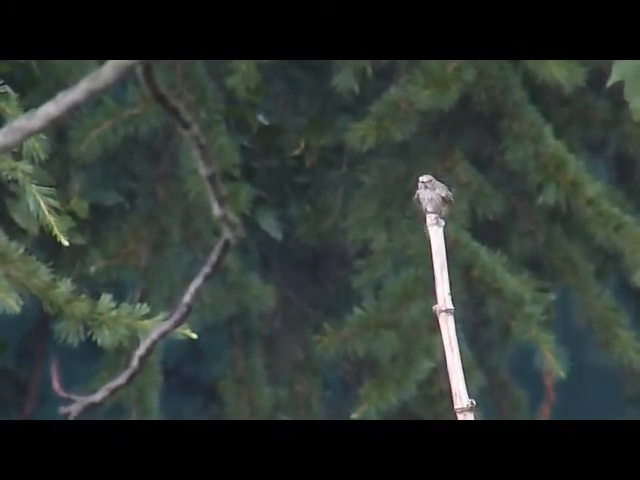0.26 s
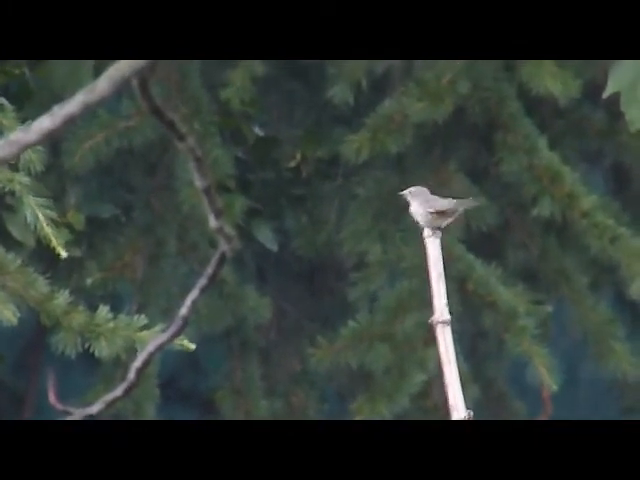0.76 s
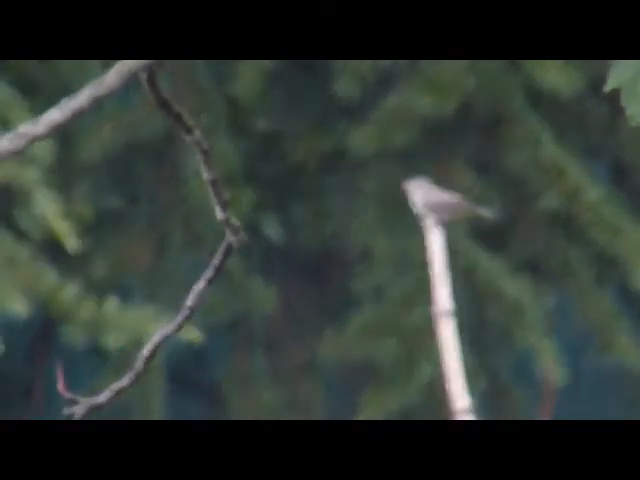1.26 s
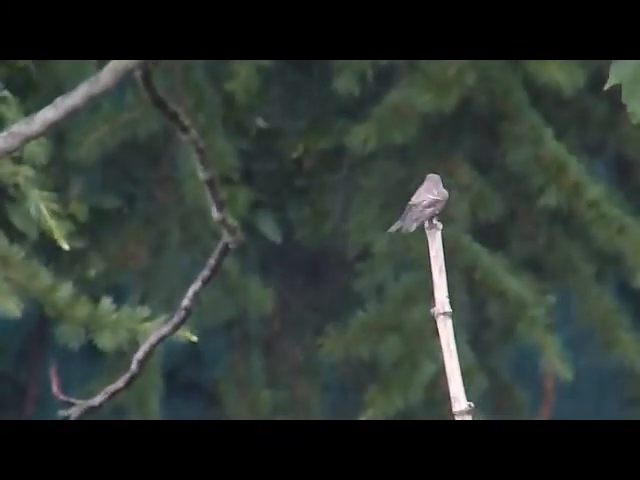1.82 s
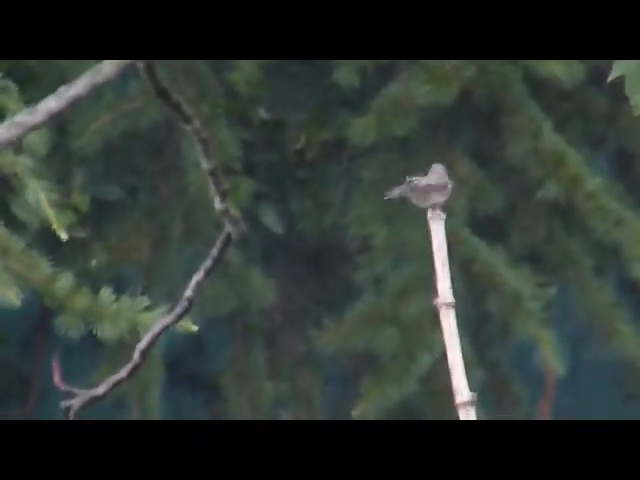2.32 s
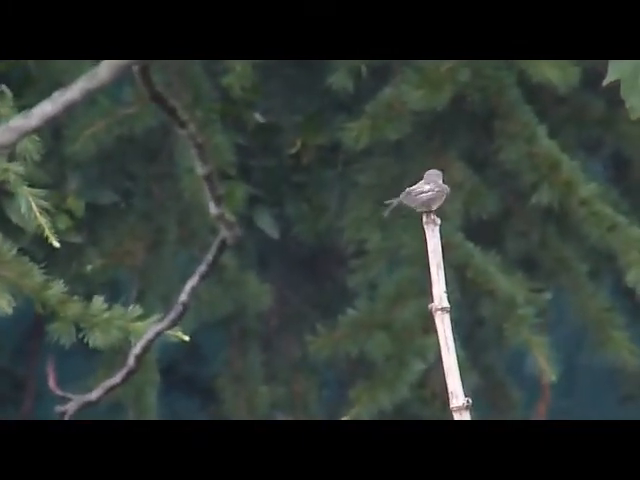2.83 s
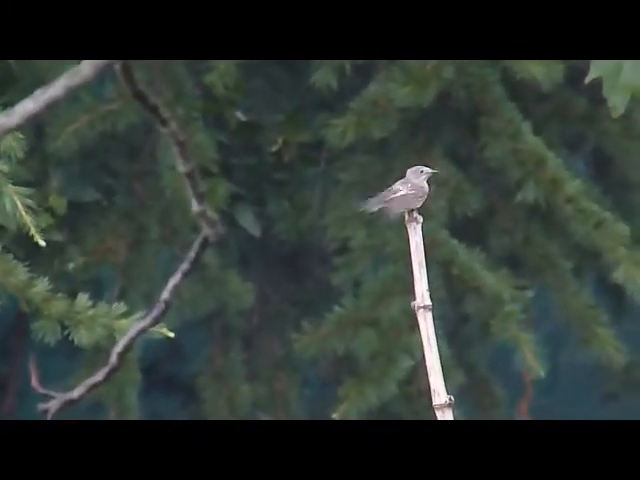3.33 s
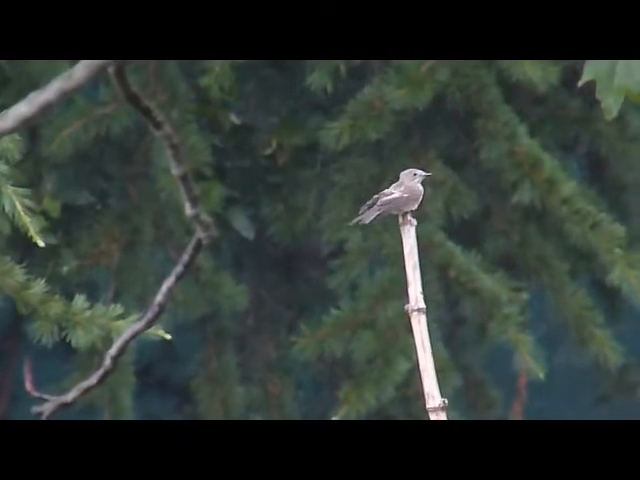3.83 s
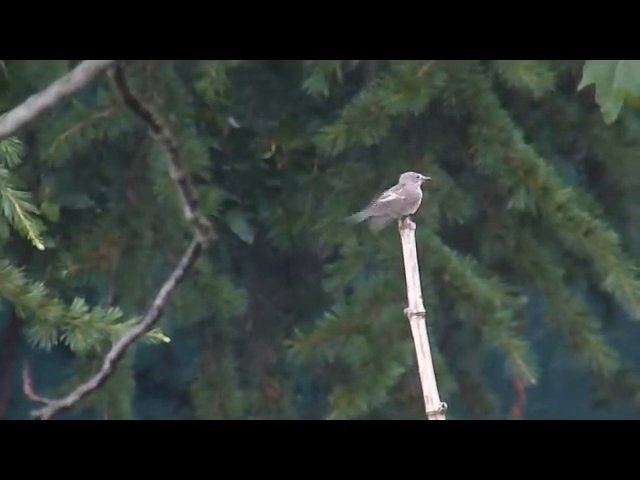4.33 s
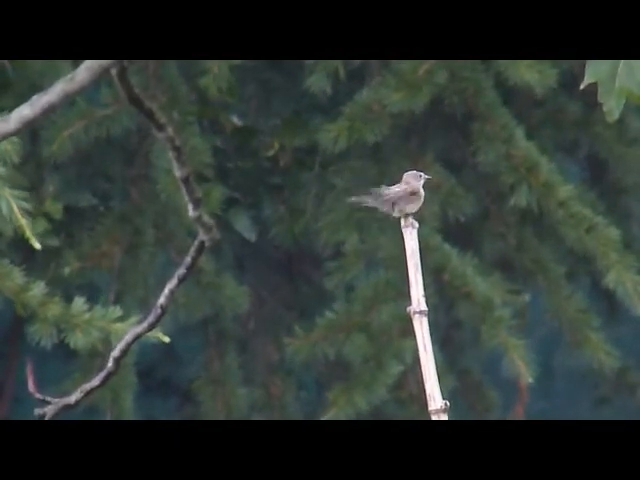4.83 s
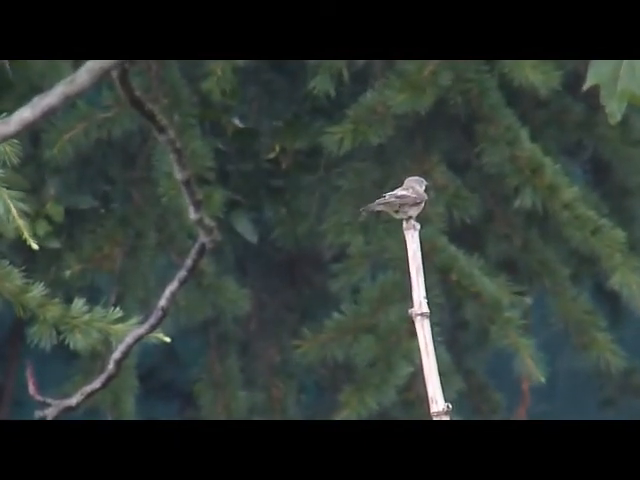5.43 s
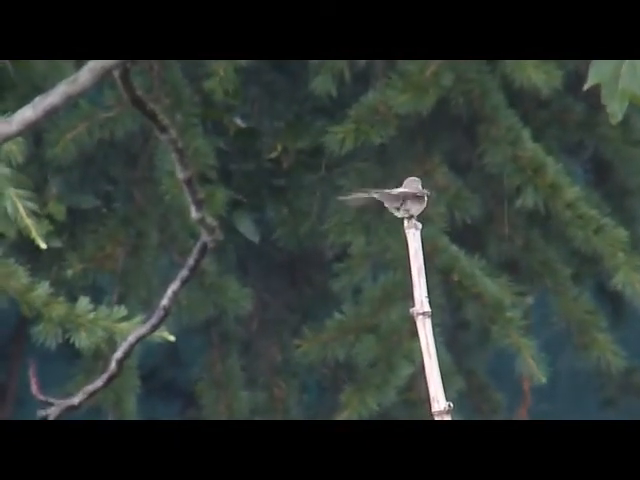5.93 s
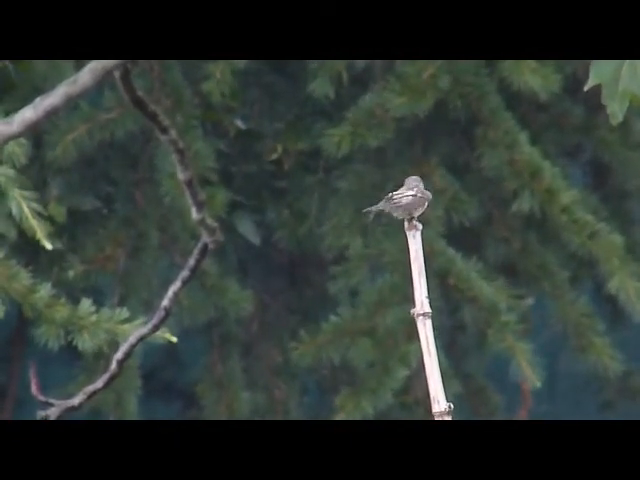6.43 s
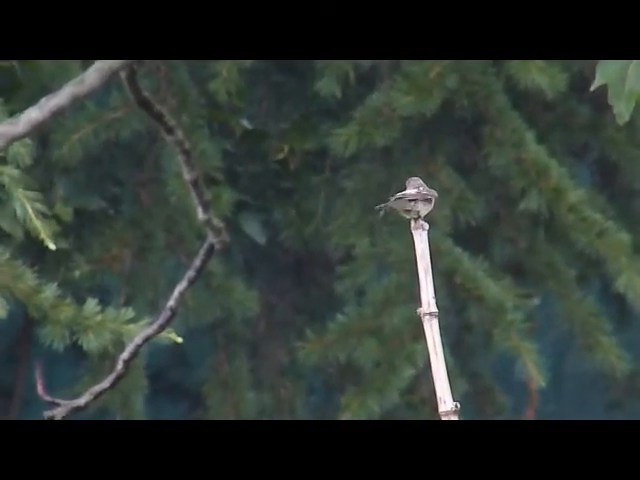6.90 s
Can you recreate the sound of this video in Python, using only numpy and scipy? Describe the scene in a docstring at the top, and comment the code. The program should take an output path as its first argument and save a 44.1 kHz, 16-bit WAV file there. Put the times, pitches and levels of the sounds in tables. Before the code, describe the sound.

Even rain on foliage over a low outdoor murmur, scattered crisp drips, a faint early grumble, then deep thunder building from five seconds.

```python
"""Steady rain on the trees of a garden, heard from a sheltered spot, over a low murmur.
Throughout, random impulses and patchy noise make hiss and patter, and short sine bursts make drips.
In the first four seconds the rain has brief flurries, and the murmur bumps softly and gains deep bass.
Near 2.4 s thunder grumbles faintly; from about five seconds it rolls in, as coloured noise and shocks,
with a deep boom under it, and swells into a few dull thuds."""
import sys
import numpy as np
from scipy import signal
from scipy.fft import rfft, irfft, next_fast_len
from scipy.io import wavfile
from scipy.ndimage import uniform_filter1d, map_coordinates

SR = 44100
rng = np.random.default_rng(int(sys.argv[2]) if len(sys.argv) > 2 else 0)


def wrap_up_sound(samples):
    """Save the sound to the file named by the first command line argument, as 16-bit audio."""
    columns = np.atleast_2d(samples).T
    # keep every value between -1 and 1, then stretch to whole-number steps
    tamed = np.clip(columns, -1, 1)
    steps = np.round(tamed * 32767).astype(np.int16)
    wavfile.write(sys.argv[1], SR, steps)


N = 315749


# spectrum of the fine ticking: frequency_hz, relative_density_db (dB per Hz)
HISS_SPECTRUM = [(1200, -24), (2400, -2), (3300, -0.5), (5000, 1), (6000, -0.5), (6600, -2), (7600, -6)]
# spectrum of the patter on foliage: frequency_hz, relative_density_db (dB per Hz)
WASH_SPECTRUM = [(150, -14.5), (320, -7.5), (470, -4), (620, -0.5), (800, -2.5), (980, -1), (1150, -3),
                 (1500, -3.5), (1800, -4.5), (2250, -4.5), (3000, -7), (4500, -12), (7000, -32.5)]
# brief flurries of heavier rain: crest_s, wash_rise_db
RAIN_FLURRIES = [(1.42, 0.6), (2.17, 1.3), (3.74, 0.5)]
HISS_START_DB, WASH_START_DB, EASE_DB_PER_S = -35.5, -34, 0.09
FLURRY_SPREAD_S, FLURRY_HISS_SHARE = 0.17, 0.2  # bell width; how far the hiss follows


def rain():
    """Superposition: countless far drops merge into noise; nearer ones patter on leaves, tick on needles."""
    ticks = patchy_noise(patchy_db=0.74) + amp(-7.0) * impacts(rate=600, scatter_db=3.5)
    patter = patchy_noise(patchy_db=0.73) + amp(-8.5) * impacts(rate=220, scatter_db=3.5)
    strength_db = 0.16 * wobble(rate=14) - EASE_DB_PER_S * np.arange(N) / SR
    flurry_db = sum(rise_db * hump(crest_s, FLURRY_SPREAD_S) for crest_s, rise_db in RAIN_FLURRIES)
    hiss_gain = amp(HISS_START_DB + strength_db + FLURRY_HISS_SHARE * flurry_db)
    wash_gain = amp(WASH_START_DB + strength_db + flurry_db)
    hiss = hiss_gain * outdoors(ticks, lambda hz: along(HISS_SPECTRUM, hz))
    wash = wash_gain * outdoors(patter, lambda hz: along(WASH_SPECTRUM, hz))
    return hiss + wash


# single close drips: start_s, level_db, pitch_hz, left_over_right_db, splash_share (0-1)
CLOSE_DRIPS = [(1.4175, -16.5, 6180, 1, 0.1), (2.042, -21, 4480, -4, 0), (2.2868, -15, 6380, -18, 1),
               (2.427, -18.5, 4340, 1, 0.2), (2.445, -21, 6160, 3.5, 0.2), (5.304, -20.5, 5240, 4, 0.2),
               (6.149, -19.5, 4380, -5.5, .2)]


def drips(swell_s=0.0001, splash_gap_s=0.00097, splash_decay_s=0.0029, count=6):
    """Damped oscillation: a drop snaps for a cycle or two; its splash droplets land just after it."""
    out = np.zeros((2, N + SR))
    t = np.arange(SR // 40) / SR
    order = np.arange(count)  # 0 is the drop itself, the rest are droplets
    for start_s, level_db, pitch_hz, pan_db, splash in [*CLOSE_DRIPS, *random_drips()]:
        chance = rng.standard_normal((count, 2))
        delays = splash_gap_s * np.abs(order + 0.12 * chance[:, 0] * (order > 0))
        sizes = np.where(order > 0, splash * np.exp((splash_gap_s - delays) / splash_decay_s), 1)
        pitches = pitch_hz * (1 + 0.06 * chance[:, 1:])
        age = np.maximum(t - delays[:, None], 0)
        envelope = age / swell_s * np.exp(1 - age / swell_s)  # reaches 1 at swell_s
        snaps = np.sin(2 * np.pi * pitches * age) * envelope
        gains = amp(level_db + pan_db * np.array([[1], [-1]]) / 2)
        out[:, round(start_s * SR):][:, :len(t)] += gains * (sizes @ snaps)
    return out[:, :N]


# mean row and spread row of further drips: level_db, pitch_hz, left_over_right_db, splash_share
RANDOM_DRIP = [(-20.5, 6300, 1, 0.18), (0.5, 300, 5.5, 0.06)]


def random_drips(count=9):
    """Independent arrivals: start times are uniform, the other columns normally distributed."""
    mean, spread = np.array(RANDOM_DRIP)
    starts_s = rng.random(count) * N / SR
    return np.column_stack([starts_s, mean + spread * rng.standard_normal((count, len(mean)))])


# spectrum of the thunder: frequency_hz, relative_density_db
THUNDER_SPECTRUM = [(30, -34.5), (80, -13.5), (120, -11.5), (150, -4), (230, -2), (290, -7.5), (380, -5),
                    (480, -7.5), (600, -9), (800, -11), (1100, -23), (1800, -33.5), (4000, -80)]
# resonances between the surrounding walls: frequency_hz, width_hz, rise_db
WALL_RESONANCES = [(144.2, 19, 9), (162.7, 14, 7.5), (217, 22, 3), (338, 26, 7), (386, 26, 9.5),
                   (426, 13, 9.5), (554, 29, 8.5), (625, 11, 7.5), (897, 80, 5.5)]
# thuds within the thunder: crest_s, level_db, spread_s (bell width), dull_above_hz
THUNDER_THUDS = [(2.555, -37, .035, 1000), (5.42, -32, 0.062, 190), (5.627, -31.5, 0.022, 600),
                 (6.218, -28.5, 0.051, 500), (6.37, -24, 0.011, 260), (6.558, -20.5, 0.026, 230),
                 (6.748, -18.5, 0.028, 220)]
# a deep boom that sets in with the main roll and lingers
BOOM_AT_S, BOOM_DB, BOOM_RISE_S, BOOM_FADE_DB_PER_S = 5.25, -42.5, 0.1, 7


def thunder(boom_hz=60.5, boom_width_hz=6):
    """Dispersed arrival: shocks along the lightning channel come blurred and dulled, and ring between walls."""
    def colour(hz):
        ringing = sum(rise_db / (1 + (2 * (hz - centre_hz) / width_hz) ** 2)
                      for centre_hz, width_hz, rise_db in WALL_RESONANCES)
        return along(THUNDER_SPECTRUM, hz) + ringing

    def shocks():
        return patchy_noise(patchy_db=-1.5) + impacts(rate=300, scatter_db=1.5)

    def dulled(edge_hz):
        return outdoors(shocks(), lambda hz: colour(hz) - 10 * np.log10(1 + (hz / edge_hz) ** 4))

    def deep(hz):
        return -20 * np.log10(1 + ((hz - boom_hz) / boom_width_hz) ** 2)

    roll_gain, bass_db = peals()
    roll = roll_gain * weighted(even(outdoors(shocks(), colour), span=0.084), bass_db, edge_hz=180)
    # the strongest shocks come in bunches, each dulled by its own path
    thuds = sum(amp(level_db) * hump(crest_s, spread_s) * even(dulled(edge_hz), span=0.059)
                for crest_s, level_db, spread_s, edge_hz in THUNDER_THUDS)
    boom_gain = amp(BOOM_DB) * surge(BOOM_AT_S, BOOM_RISE_S, BOOM_FADE_DB_PER_S)
    boom = boom_gain * even(outdoors(shocks(), deep), span=0.28)
    return roll + thuds + boom


# peals of thunder, a faint early grumble first: crest_s, level_db, bass_weight_db
THUNDER_PEALS = [(2.33, -38, -8.5), (5.38, -31, 1.5), (6.2, -30.5, -6), (6.56, -27, -5), (6.97, -28, 8)]
PEAL_RISE_S, PEAL_FADE_DB_PER_S = 0.19, 8  # every peal swells quickly and dies slowly


def peals():
    """Power addition of unrelated peals: returns the gain of the roll and its bass weight in dB."""
    power = np.array([(amp(level_db) * surge(crest_s, PEAL_RISE_S, PEAL_FADE_DB_PER_S)) ** 2
                      for crest_s, level_db, _ in THUNDER_PEALS])
    total = power.sum(axis=0) + 1e-20
    bass_db = np.array([bass_weight_db for _, _, bass_weight_db in THUNDER_PEALS])
    return np.sqrt(total), bass_db @ power / total


# spectrum of the low outdoor background: frequency_hz, relative_density_db
MURMUR_SPECTRUM = [(20, -32), (30, -17.5), (42, -2.5), (54, 0.5), (70, 0.5), (105, 2), (125, 0), (145, 2),
                   (190, -3.5), (250, -2.5), (310, -7.5), (500, -12), (1000, -29.5), (3000, -68)]
# soft bumps in its deep bass: crest_s, rise_db
BASS_BUMPS = [(0.69, 11), (1.9, 7), (2.35, 7.5)]
BUMP_SPREAD_S = 0.079
MURMUR_START_DB, MURMUR_FALL_DB_PER_S = -38.5, 0.26
# the deep bass fills in once: weight before and after, midpoint and pace of the change
DEEP_BEFORE_DB, DEEP_AFTER_DB, DEEP_AT_S, DEEP_PACE_S = -5.5, 3, 2.2, 0.74


def murmur():
    """Low-pass noise: the dull, far-off garden background; its deepest part fills in and bumps softly."""
    t = np.arange(N) / SR
    filled = (1 + np.tanh((t - DEEP_AT_S) / DEEP_PACE_S)) / 2
    bumps_db = sum(rise_db * hump(crest_s, BUMP_SPREAD_S) for crest_s, rise_db in BASS_BUMPS)
    deep_db = DEEP_BEFORE_DB + (DEEP_AFTER_DB - DEEP_BEFORE_DB) * filled + bumps_db
    air = even(outdoors(patchy_noise(patchy_db=1.5), lambda hz: along(MURMUR_SPECTRUM, hz)), span=0.32)
    return amp(MURMUR_START_DB - MURMUR_FALL_DB_PER_S * t) * weighted(air, deep_db, edge_hz=84)


# bass reaches both sides alike, treble less so: frequency_hz, side_over_centre_db
STEREO_WIDTH = [(55, -38.5), (120, -44.5), (230, -33), (295, -26), (350, -30), (460, -20.5), (550, -20.5),
                (750, -13.5), (1000, -12), (1500, -9.5), (2100, -5), (2700, -2), (4200, -3), (6500, -5.5)]
# the outdoor sound is louder to the right: frequency_hz, left_over_right_db
SIDE_LEAN = [(600, 0), (900, -0.8), (1500, -2), (2400, -2.5), (4000, -1.5), (6500, -0.1)]
# and reaches the right first: frequency_hz, left_lead_rad
SIDE_LEAD = [(300, 0), (900, -0.2), (1700, -0.9), (2600, -0.47), (4000, -.3), (7000, -0.42)]


def outdoors(pair, colour):
    """Spatial coherence: colours two unrelated signals and spreads them; the centre has rms 1 before the lean."""
    def centre_and_side(hz):
        angle = np.arctan(amp(along(STEREO_WIDTH, hz)))
        return amp(colour(hz)) * [np.cos(angle), np.sin(angle)]

    def lean(hz):
        # long waves diffract round the receiver and favour neither side
        half = np.array([[1], [-1]]) / 2 * hz ** 4 / (hz ** 4 + 500 ** 4)
        return amp(half * along(SIDE_LEAN, hz)) * np.exp(1j * half * along(SIDE_LEAD, hz))

    mid, side = filtered(pair, centre_and_side)
    return filtered(np.array([mid + side, mid - side]) / np.std(mid), lean)


def patchy_noise(patchy_db):
    """Random modulation: two unrelated noises whose bands swell and fade in patches."""
    bands = signal.stft(rng.standard_normal((2, N)), nperseg=512)[2]
    field = uniform_filter1d(rng.standard_normal(bands.shape), size=8, axis=1)  # over frequency
    field = uniform_filter1d(field, size=16, axis=2)  # over time
    return unit(signal.istft(bands * amp(patchy_db * unit(field)), nperseg=512)[1][:, :N])


def impacts(rate, scatter_db):
    """Shot noise: two unrelated streams of impulses, rate a second, of clipped log-normal size."""
    falls = rng.random((2, N)) < rate / SR
    sizes = amp(scatter_db * np.clip(rng.standard_normal((2, N)), -2, 2))
    return unit(falls * sizes * rng.choice([-1, 1], (2, N)))


def weighted(x, bass_db, edge_hz):
    """Shelving: raises or lowers everything below the edge by a curve over time."""
    return x + (amp(bass_db) - 1) * filtered(x, lambda hz: 1 / (1 + (hz / edge_hz) ** 4))


def even(x, span):
    """Power normalisation: holds x near rms 1 over every stretch of span seconds."""
    window = np.hanning(int(span * SR) + 3)
    energy = signal.fftconvolve(np.mean(x ** 2, axis=0), window, "same")
    power = energy / signal.fftconvolve(np.ones(N), window, "same")
    return x / np.sqrt(np.abs(power) + 1e-9)


def hump(crest_s, spread_s):
    """Gaussian envelope: a bell-shaped swell of height 1 with the given standard deviation."""
    return np.exp(-.5 * ((np.arange(N) / SR - crest_s) / spread_s) ** 2)


def surge(crest_s, rise_s, fade_db_per_s):
    """Exponential growth and decay: a gain that rises to 1 at the crest, then fades."""
    age = np.arange(N) / SR - crest_s
    return np.exp(np.minimum(age, 0) / rise_s) * amp(-fade_db_per_s * np.maximum(age, 0))


def wobble(rate):
    """Spline interpolation: a smooth random curve with rate knots a second."""
    return map_coordinates(rng.standard_normal(int(N * rate / SR) + 4), [np.arange(N) * rate / SR])


def filtered(x, response):
    """Linear filtering: multiplies the spectrum of x by a response of frequency."""
    m = next_fast_len(N + SR // 2)
    return irfft(rfft(x, m) * response(np.fft.rfftfreq(m, 1 / SR)), m)[..., :N]


def along(points, hz):
    """Logarithmic frequency scale: interpolates (frequency_hz, value) points."""
    f, v = np.transpose(points)
    return np.interp(np.log(hz + 1), np.log(f + 1), v)


def amp(db):
    """Level law: decibels to amplitude gain."""
    return 10 ** (np.asarray(db) / 20)


def unit(x):
    """Root-mean-square scaling: x at rms 1."""
    return x / np.sqrt(np.mean(x ** 2) + 1e-20)


def scene():
    """Superposition of all sources: rain and drips, thunder far off, the murmur beneath."""
    return rain() + drips() + thunder() + murmur()


# treble response of the microphone: frequency_hz, gain_db
TREBLE_RESPONSE = [(6200, 0), (6800, -2), (7150, -7), (7400, -12.5), (7600, -22)]
TOP_HZ = 7630


def record(dry):
    """Band limitation: the treble rolls off and ends at the top frequency."""
    return filtered(dry, lambda hz: amp(along(TREBLE_RESPONSE, hz)) * (hz < TOP_HZ))


dry = scene()
out = record(dry)
wrap_up_sound(out)
```